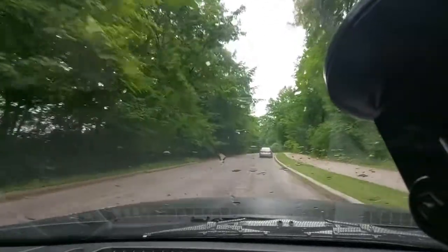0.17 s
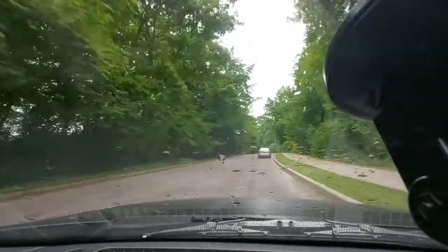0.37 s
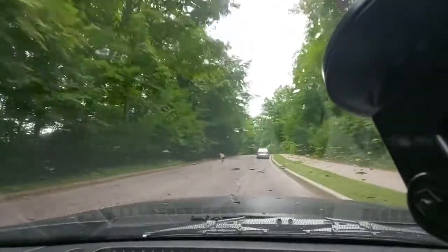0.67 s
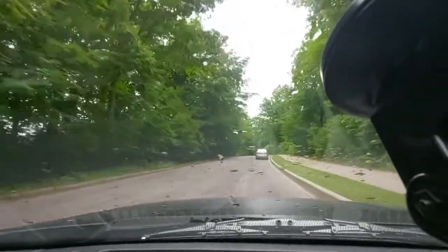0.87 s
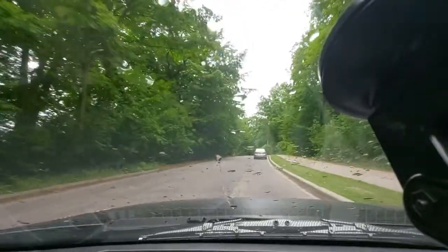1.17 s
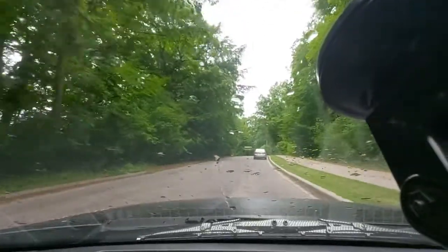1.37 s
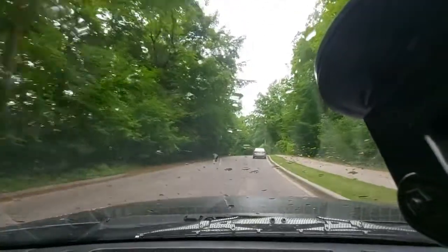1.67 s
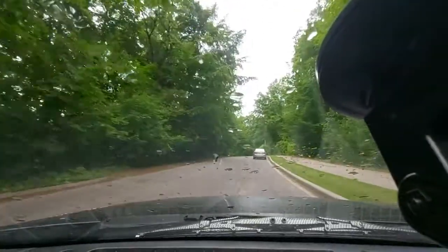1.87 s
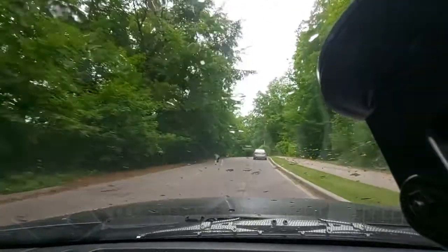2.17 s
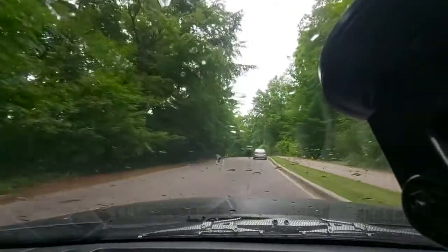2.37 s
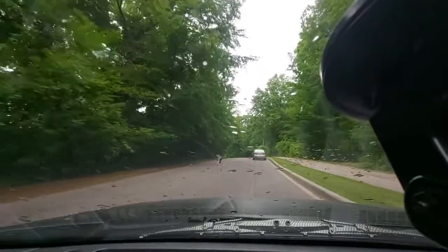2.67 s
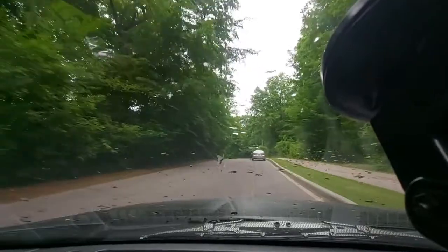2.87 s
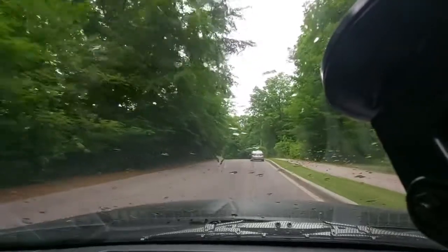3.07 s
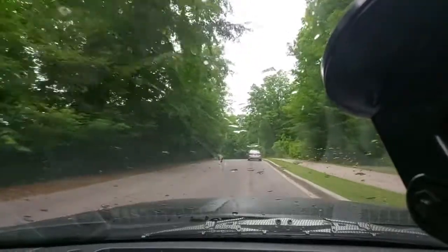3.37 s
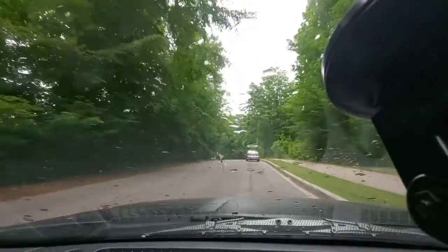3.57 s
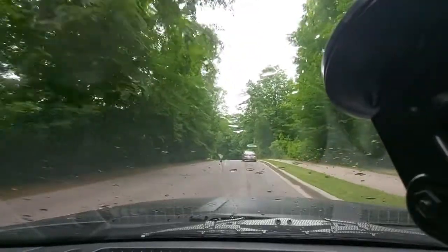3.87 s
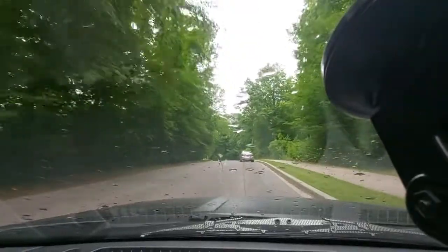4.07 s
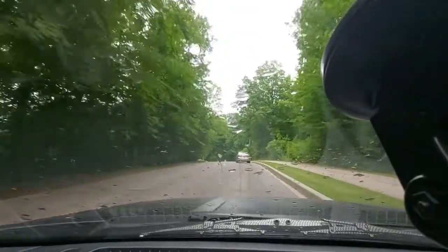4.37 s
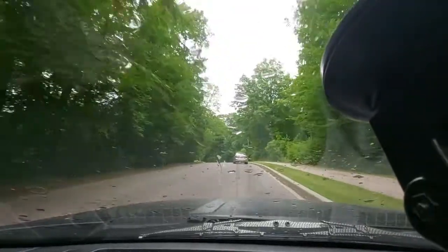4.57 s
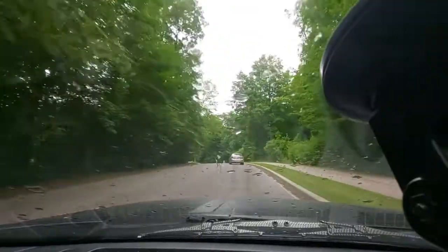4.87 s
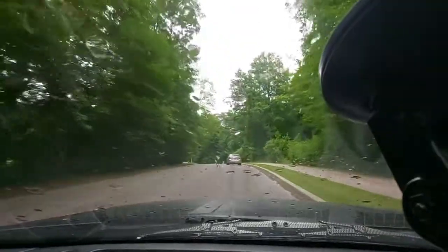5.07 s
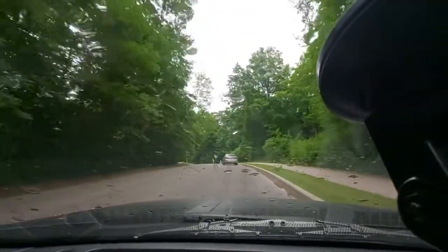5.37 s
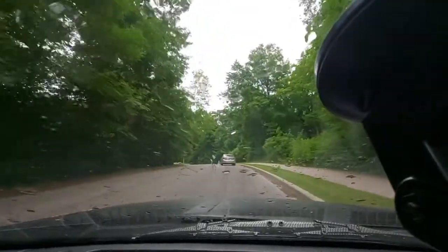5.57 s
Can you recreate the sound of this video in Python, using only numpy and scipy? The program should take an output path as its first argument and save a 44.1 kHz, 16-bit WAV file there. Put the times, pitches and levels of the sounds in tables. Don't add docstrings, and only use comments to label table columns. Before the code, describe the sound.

Steady deep six-cylinder drone in a car cabin, dipping and recovering, with road boom, soft bumps, key jingles, trim knocks and tiny clicks.

```python
import sys
import numpy as np
from scipy import signal
from scipy.fft import rfft, irfft, next_fast_len
from scipy.io import wavfile
from scipy.ndimage import uniform_filter1d, map_coordinates

SR = 44100
rng = np.random.default_rng(int(sys.argv[2]) if len(sys.argv) > 2 else 0)


def rack_gain(trim_db):
    fader = np.asarray(trim_db, float)
    return 10 ** (fader / 20)


def wav_out(sig):
    wavfile.write(sys.argv[1], SR, np.round(np.clip(np.atleast_2d(sig).T, -1, 1) * 32767).astype(np.int16))


N = 252336

SECOND_DB = -14
THIRD_DB_PER_HZ, THIRD_KNEE_HZ = -2.5, 88.5
LIFT_OFF_S = 0.54


def unit(x):
    return x / np.sqrt(np.mean(x ** 2) + 1e-20)


def along(points, hz):
    f, v = np.transpose(points)
    return np.interp(np.log(hz + 1), np.log(f + 1), v)


def curves(rows):
    s, *cols = np.transpose(rows)
    return [np.interp(np.arange(N) / SR, s, c) for c in cols]


def wobble(rate):
    knots = rng.standard_normal(int(N * rate / SR) + 4)
    return map_coordinates(knots, [np.arange(N) * rate / SR])


def filtered(x, response):
    m = next_fast_len(N + 8192)
    return irfft(rfft(x, m) * response(np.fft.rfftfreq(m, 1 / SR)), m)[..., :N]


def resonances(modes):
    def response(f):
        total = 0
        for k, (c, w, db) in enumerate(modes):
            total = total + (-1) ** k * rack_gain(db) * 1j * f * w / (c * c - f * f + 1j * f * w)
        return total
    return response


def lift(modes, hz):
    return rack_gain(sum(db / (1 + ((hz - c) / w) ** 2) for c, w, db in modes))


def rush(spectrum, patchy_db):
    # frequency in Hz, likeness of left and right from -1 to 1.
    likeness = [(25, .99), (60, .985), (130, .96), (290, .8), (640, .3), (1400, -.15), (3100, .1),
                (15000, .15)]
    z = signal.stft(rng.standard_normal((2, N)), nperseg=512)[2]
    field = uniform_filter1d(rng.standard_normal(z.shape[1:]), size=8, axis=0)
    field = uniform_filter1d(field, size=8, axis=1)
    pair = signal.istft(z * rack_gain(patchy_db * unit(field)), nperseg=512)[1][:, :N]

    def mid_side(hz):
        angle = np.arccos(np.clip(along(likeness, hz), -1, 1)) / 2
        inside = (hz < spectrum[-1][0]) * (hz > spectrum[0][0])
        return rack_gain(along(spectrum, hz)) * inside * [np.cos(angle), np.sin(angle)]
    mid, side = filtered(pair, mid_side)
    return unit(np.array([mid + side, mid - side]))


def burst(envelope, shared):
    noise = rng.standard_normal((3, len(envelope)))
    pair = (shared * noise[2] + np.sqrt(1 - shared ** 2) * noise[:2]) * envelope
    return unit(pair) * np.sqrt(np.mean(envelope ** 2))


def note(hz, length, lead, sag=0):
    size = round(length * SR)
    u = np.arange(size) / size
    drift = .12 * np.cumsum(rng.standard_normal(SR // 8)[:size]) / np.sqrt(size)
    cycles = hz * length * (u + sag * u * (1 - u) / 2) + drift + rng.random()
    return np.hanning(size) * np.sin(2 * np.pi * cycles + np.array([[lead], [-lead]]))


def add(track, s, sound):
    i = max(round(s * SR), 0)
    track[..., i:i + sound.shape[-1]] += sound[..., :N - i]


def controls():
    # time in seconds, firing rate in Hz, load as peak dB of the firing order.
    throttle = [(0.0, 93.6, -7), (0.1, 92.3, -8), (0.26, 89.6, -11), (0.42, 87.54, -11), (0.58, 87.6, -18),
                (0.9, 86.2, -22), (1.22, 84, -22.5), (1.42, 83.2, -22.5), (1.7, 83.2, -19.5),
                (2.02, 86.38, -10), (2.2, 86.9, -9), (2.5, 87.47, -10.5), (3.1, 88.6, -11),
                (3.7, 89.9, -10), (4.1, 89.9, -9.5), (4.4, 91, -9), (4.9, 91.9, -10.5), (5.72, 88.6, -15.5)]
    cruise_hz, cruise_db = 88, -10
    hz, load_db = curves(throttle)
    t = np.arange(N) / SR
    second = SECOND_DB + 0.99 * (load_db - cruise_db) - 0.27 * (hz - cruise_hz)
    second = second - 2.5 * np.clip((LIFT_OFF_S - t) / 0.07 + .5, 0, 1)
    third = second - 8.5 + THIRD_DB_PER_HZ * np.maximum(hz - THIRD_KNEE_HZ, 0)
    return hz, load_db, second, third - 32 * np.clip(1 - t / LIFT_OFF_S, 0, 1)


def engine():
    # order, phase in radians, side level in dB, side lead in radians.
    main_orders = [(1, 0.14, -24, 0.9), (2, 1.2, -16.5, 0.68), (3, 0.96, -17.5, -1.8)]
    # order, middle level in dB, side level in dB, both below the second order.
    minor_orders = [(1.333, -19, -56), (1.5, -25.5, -40), (2.5, -26.5, -27.5), (3.5, -25.5, -40.5),
                    (4, -35, -37), (4.5, -48.5, -41), (5, -43.5, -46), (5.5, -51.5, -47), (6, -45.5, -44.5),
                    (6.5, -52.5, -42), (7, -48, -41), (7.5, -64.5, -47.5), (8, -59, -46)]
    # frequency in Hz, width in Hz, lift in dB.
    seat_air = [(322, 7, -7), (351, 9, 14), (412, 8, 6), (455, 14, 4), (505, 6, 3), (528, 12, 11),
                (612, 12, 8), (640, 10, 5)]
    # frequency in Hz, width in Hz, lift in dB.
    door_air = [(227, 10, 4), (268, 8.8, -5.5), (319, 11, 14.5), (470, 15, -1)]
    lope_db, main_lope_db = 6, .3
    hz, *levels = controls()
    now = np.arange(N) / SR
    turn = 2.9 + 2 * np.pi * np.cumsum(hz + 0.2 * wobble(14)) / SR
    lope = np.cos(turn / 6)
    blunt_lead = .9 * np.clip(1 - now / .35, 0, 1)
    mid = side = 0
    for (k, phase, side_db, lead), db in zip(main_orders, levels):
        phase = k * turn + phase + (k == 2) * blunt_lead + 0.025 * k * wobble(3.3)
        mid = mid + rack_gain(db + 0.53 * wobble(35) + k * main_lope_db * lope) * np.cos(phase)
        load = levels[1] if k == 3 else db
        width = lift(door_air, k * hz) if k == 3 else 1
        side = side + rack_gain(load + side_db + 0.83 * wobble(10)) * width * np.cos(phase + lead)

    buzz = np.clip(np.minimum(now - 3.38, 5.42 - now) / .06, 0, 1)
    settled = np.clip(now - LIFT_OFF_S, 0, 1)
    sink = settled * THIRD_DB_PER_HZ * np.maximum(hz - THIRD_KNEE_HZ, 0) - 4 * (1 - settled)
    for k, mid_db, side_db in minor_orders:
        pulse_blunt = np.clip((2.7 if k == 6 else 1.3) - 1.8 * now / LIFT_OFF_S, 0, 1)
        change_db = {4: 14, 5: 5, 6: 8}.get(k, 0) * pulse_blunt
        change_db = change_db + (k in (5, 5.5)) * 10 * buzz + (k in (3.5, 4)) * sink
        lope_share = (k in (3.5, 4)) + (k in (5, 6, 7)) / 3
        throb_db = lope_share * lope_db * (1 - pulse_blunt) * lope
        size = rack_gain(levels[1] + change_db + throb_db + 1.5 * wobble(5))
        mid_tone = np.cos(k * turn + .35 * wobble(5))
        side_tone = np.cos(k * turn + 1.7 + .6 * wobble(3.8))
        mid = mid + size * rack_gain(mid_db) * lift(seat_air, k * hz) * mid_tone
        side = side + size * rack_gain(side_db) * lift(door_air, k * hz) * side_tone
    return np.array([mid + side, mid - side])


def tyres():
    # frequency in Hz, level in dB per Hz.
    boom_spectrum = [(12, -30), (24, -8), (35, -3), (57, 0), (72, -6), (95, -11), (115, -40)]
    drum_spectrum = [(75, -43.5), (105, -3), (130, 29), (155, 19.5), (210, 18.5), (300, 8.5), (380, -68)]
    roar_spectrum = [(200, -18), (300, 8.5), (400, -3.5), (550, -12), (750, -13.5), (1000, -22),
                     (1300, -30.5), (2000, -41)]
    hiss_spectrum = [(700, -29.5), (1300, 2.5), (2000, -1), (3200, -9.5), (5000, -15.5), (8000, -19.5),
                     (12500, -19.5), (15800, -27)]
    effort_db, now = controls()[2] - SECOND_DB, np.arange(N) / SR
    smooth = np.clip(np.minimum(now - 3.55, 5.05 - now) / 0.25 + .5, 0, 1)
    boom_db = -34.5 - 3.5 * smooth
    drum_db = -27 + 0.59 * effort_db - 1.5 * smooth + 1.2 * wobble(12)
    roar_db = -53.5 + .48 * effort_db - smooth
    hiss_db = -63.5 + .4 * (roar_db + 57) + 1.5 * wobble(30) + [[.7], [-.7]]
    out = rack_gain(boom_db) * rush(boom_spectrum, patchy_db=.5)
    out += rack_gain(drum_db) * rush(drum_spectrum, patchy_db=0.16)
    out += rack_gain(roar_db + 17.5 + .7 * wobble(11)) * rush(roar_spectrum, patchy_db=.8)
    return out + rack_gain(hiss_db) * rush(hiss_spectrum, patchy_db=.9)


def keys():
    # time in seconds, peak in dB, jingle in dB against the peak.
    shakes = [(0.1146, -54, -9), (0.2428, -52.5, -7.5), (0.28, -55.5, -11.5), (0.3237, -60, -17),
              (0.3818, -61.5, -14.5), (0.4279, -52, -9), (0.4678, -59, -5.5), (0.5142, -50, -7.5),
              (0.5602, -54, -14), (0.6091, -57.5, -13), (0.6492, -55, -11.5), (.772, -63.5, -15),
              (.793, -61, -14), (0.8718, -63.5, -14), (0.9186, -60.5, -11.5), (0.9519, -61.5, -14.5),
              (.97, -65.5, -15.5), (1.2039, -61, -11.5), (1.3127, -60, -4), (1.3381, -56.5, -13),
              (1.639, -59, -13.5), (1.752, -55, -6.5), (1.798, -50.5, -7), (1.91, -57.5, -8.5),
              (2.021, -53, -13.5), (2.0656, -47, -5.5), (2.114, -51.5, -12.5), (2.1469, -49.5, -7),
              (2.2177, -51.5, -9), (2.2501, -46.5, -5), (2.2863, -45, -0.5), (2.332, -46, -4),
              (2.5273, -52.5, -6), (2.5612, -48, -6.5), (2.844, -51.5, -12.5), (2.935, -60, -0.0),
              (2.965, -53.5, -9), (3.012, -49, -5), (3.0485, -52.5, -5), (3.1418, -57, -14.5),
              (3.1819, -60, -14), (3.2174, -53, -6.5), (3.252, -50, -10), (3.2904, -56, -3.5),
              (3.3307, -51, -3), (3.3602, -60.5, -15), (3.7885, -59, -10.5), (4.2791, -59.5, -12.5),
              (5.0579, -58, -6.5), (5.0929, -49.5, -11), (5.1362, -52, -18.5), (5.1777, -51, -15.5),
              (5.2236, -55, -12), (5.2603, -52.5, -19), (5.2974, -55, -13), (5.4172, -54, -7),
              (5.597, -55, -20), (5.6342, -50.5, -8.5), (5.6764, -52.5, -11.5)]
    # time in seconds, peak in dB.
    touches = [(0.0155, -60.5), (0.0481, -56), (0.1786, -56), (0.208, -56), (0.4127, -51.5),
               (0.4575, -50.5), (0.5454, -57.5), (0.7859, -60), (1.263, -56), (1.4129, -55.5),
               (4.0685, -56.5), (5.2061, -51), (5.256, -51.5), (5.3372, -55), (5.475, -54), (5.5066, -50),
               (5.6106, -51.5)]
    # Hz, delay in seconds, length in seconds, dB.
    warble_modes = [(2270, .005, .015, -2), (2085, .013, .022, 1), (1750, .021, .016, -9),
                    (3250, .009, .024, -10.5), (2620, .006, .014, -12)]
    # frequency in Hz, level in dB, seconds to fall 60 dB.
    jingle_modes = [(7020, -9, .04), (8850, -1, .04), (9710, -1, .05), (11000, -4, .04), (12200, -4, .04),
                    (12650, 0, .025), (13200, -7, .03)]
    # frequency in Hz, width in Hz, level in dB.
    key_modes = [(1840, 18, -7), (2100, 110, -6), (2220, 30, -11), (2700, 79, -13), (3120, 60, -9),
                 (6960, 33, -22.5), (7770, 49, -25.5), (8500, 60, -14.5), (9200, 50, -18), (9800, 80, -14),
                 (10900, 60, -19), (12200, 60, -19), (12650, 90, -18.5), (13200, 60, -24.5)]
    # frequency in Hz, width in Hz, level in dB.
    clatter_modes = [(2020, 740, -4), (3320, 610, -5), (4260, 790, -9.5), (7200, 1000, -13),
                     (10200, 9000, -17), (14200, 1200, -24)]
    # frequency in Hz, width in Hz, level in dB.
    small_key_modes = [(7000, 2000, 0), (9500, 2500, -1.5), (12500, 3000, -4)]
    stir_s, t = .09, np.arange(SR // 16) / SR
    swell, snap, tones, small = np.zeros((4, 2, N))
    stir, fade = np.zeros(N), np.hanning(round(2 * stir_s * SR))
    for s, db, jingle_db in shakes:
        add(stir, s - stir_s, rack_gain(db + 52) * fade)
        soft = burst(t / 0.006 * np.exp(1 - t / 0.008), shared=0.14)
        sharp = burst(np.exp(-t / 0.011), shared=0.2)
        add(swell, s - .001, rack_gain(db + 9.5) * soft)
        add(snap, s - .0006, rack_gain(db + jingle_db + 24.5) * sharp)
        for hz, delay, length, mode_db in warble_modes:
            scatter, lead = rng.standard_normal(2)
            tone = note(hz * (1 + .008 * lead), length, .6 + .25 * lead, sag=.03 * (hz < 2500))
            add(tones, s + delay - length / 2, rack_gain(db + mode_db - 1 + 2 * scatter) * tone)
        for hz, mode_db, t60 in jingle_modes:
            scatter, lead, phase = rng.standard_normal(3)
            angle = 2 * np.pi * hz * (1 + .008 * phase) * t + 4 * phase
            angle = angle + np.array([[1], [-1]]) * (.5 + .3 * lead)
            ring = rack_gain(-60 * t / t60) * (1 - np.exp(-t / .0006)) * np.sin(angle)
            add(tones, s - .0006, rack_gain(db + jingle_db + mode_db - 4 + 3 * scatter) * ring)
    for s, db in touches:
        add(small, s - .0005, rack_gain(db + 6.5) * burst(np.exp(-t / .0025), shared=.4))

    flutter_db = .75 * 20 * np.log10(1 + stir) + 2.5 * wobble(45) + 4 * wobble(500)
    chatter = rack_gain(flutter_db - 61) * burst(np.ones(N), shared=0.23)
    blunt = rack_gain(-6) * swell + rack_gain(-12.5) * snap + rack_gain(5.0) * chatter
    low = filtered(rack_gain(-3) * swell + rack_gain(6) * chatter, resonances(key_modes[:6]))
    high = filtered(snap + rack_gain(3.0) * chatter, resonances(key_modes[6:]))
    clatter = filtered(blunt, resonances(clatter_modes))
    return tones + low + high + clatter + filtered(small, resonances(small_key_modes))


def grit():
    # time in seconds, peak in dB.
    stones = [(1.3111, -54), (1.3969, -52), (1.4644, -47), (1.731, -46), (1.8222, -48),
              (1.8607, -49.5), (2.0455, -44), (2.2256, -48.5), (2.8876, -44.5), (3.219, -43.5),
              (3.3468, -49), (3.4797, -46), (3.5372, -46.5), (3.6099, -45.5), (3.6289, -46.5),
              (3.7318, -47.5), (3.7996, -41.5), (3.821, -42), (4.3135, -46.5), (4.333, -42),
              (4.5358, -45.5), (4.6856, -53), (4.7203, -41), (4.775, -47), (4.841, -48.5),
              (4.963, -44.5), (5.0834, -45.5), (5.3253, -47), (5.4977, -45.5), (5.63, -46.5),
              (0.9205, -52.5), (1.042, -51), (1.1891, -57), (1.6255, -55.5), (1.6911, -52.5),
                   (1.706, -53.5), (1.9315, -51.5), (2.004, -49), (2.1385, -48.5), (2.5862, -46.5),
                   (2.9358, -46.5), (3.1987, -46.5), (3.2924, -44.5), (3.4263, -53), (3.5518, -48.5),
                   (4.5017, -52.5), (4.652, -53.5), (5.2365, -49), (5.5496, -54.5)]
    # frequency in Hz, width in Hz, level in dB.
    arch_modes = [(1770, 450, -2.5), (3260, 1800, -1), (4130, 1900, 0), (7550, 3900, -8),
                  (13000, 22000, -14)]
    blows, t = np.zeros((2, N)), np.arange(SR // 80) / SR
    for s, db in stones:
        pan_db = rng.normal(0, 1.5)
        impact = np.arange(len(t)) == rng.integers(7, size=(2, 1))
        click = impact + 0.18 * burst(np.exp(-t / 0.0056), shared=0.17)
        add(blows, s, rack_gain(db + 20.5 + np.array([[pan_db], [-pan_db]])) * click)
    for s, size, pan in rng.random((60, 3)):
        click = (t == 0) + .1 * burst(np.exp(-t / .002), shared=.2)
        pan_db = np.array([[1.5], [-1.5]]) * (2 * pan - 7)
        add(blows, s * N / SR, rack_gain(-51 + 4 * (2 * size - 1.5) + pan_db) * click)
    when, size, pan = rng.random((3, 900))
    grains = rack_gain(-58.5 - 4 * np.log(size + .01))
    blows[:, (when * N).astype(int)] += grains * [pan, 1 - pan]
    return filtered(blows, resonances(arch_modes))


def bumps():
    # time in seconds, peak in dB.
    body_hits = [(0.079, -22), (0.149, -24), (0.277, -25), (0.58, -21), (0.637, -20), (0.772, -23),
                 (0.823, -25), (0.872, -18), (1.022, -21), (1.167, -25), (1.227, -21), (1.47, -21),
                 (1.526, -24), (1.576, -18), (1.659, -23), (1.74, -18), (1.816, -21), (2.236, -18),
                 (2.39, -22), (2.511, -24), (2.577, -20), (2.769, -24), (2.861, -18), (3.008, -17),
                 (3.336, -18), (3.402, -22), (3.602, -23), (5.125, -21), (5.44, -16), (5.542, -22)]
    # centre in seconds, peak in dB.
    floor_hits = [(.1, -27), (.25, -28), (.4, -28), (.7, -29), (.93, -28), (1.06, -29), (1.45, -26),
                  (1.62, -22), (1.77, -27), (1.9, -24), (2.3, -26), (2.85, -26), (2.96, -24), (3.42, -23),
                  (4.15, -27), (5.07, -26)]
    out, t = np.zeros((2, N)), np.arange(SR // 4) / SR
    rise_s, thud_s = .016, .09
    u = t / rise_s
    for s, db in body_hits:
        pitch, phase = rng.random(2)
        thump = np.sin(2 * np.pi * ((54 + 6 * pitch) * t + phase))
        add(out, s - 2 * rise_s, rack_gain(db) * (u / 2) ** 2 * np.exp(2 - u) * thump)
    for s, db in floor_hits:
        add(out, s - thud_s / 2, rack_gain(db) * note(128, thud_s, lead=.1))
    return out


def trim():
    # time in seconds, peak in dB, pitch in Hz, seconds to fall 60 dB.
    knocks = [(.13, -44, 1500, .09), (.505, -43, 1000, .1), (.61, -41, 1460, .04), (.85, -36, 670, .09),
              (.86, -40, 1100, .06), (.875, -45, 2000, .08), (.885, -36, 600, .09), (.919, -36, 1430, .04),
              (.92, -43, 2300, .04), (.935, -41, 950, .05), (1.15, -41, 720, .07), (1.164, -40, 1400, .025),
              (1.288, -51, 12000, .14), (1.29, -59, 6500, .1), (1.29, -47, 1500, .16),
              (1.31, -44, 518, .06), (1.39, -43.5, 760, .06), (1.485, -45, 1500, .12), (1.5, -38, 380, .15),
              (1.53, -40, 720, .07), (1.575, -40, 800, .1), (1.775, -48, 4300, .1), (1.79, -50, 3300, .06),
              (1.9, -52, 3600, .09), (1.908, -41, 1600, .09), (2.95, -41, 1480, .035),
              (2.973, -33, 1435, .05), (2.975, -39, 900, .05), (2.975, -43, 2300, .04), (3, -42, 600, .15),
              (3.29, -35, 400, .4), (3.292, -34, 1000, .08), (3.292, -44, 3600, .05), (3.31, -38, 650, .1),
              (3.294, -39, 1700, .06), (3.335, -41, 1100, .06), (3.35, -39, 540, .13),
              (3.371, -38, 1074, .07), (5.058, -38, 1400, .035), (5.11, -50, 4200, .08),
              (5.414, -39, 1700, .07), (5.425, -37, 360, .15), (5.4305, -35, 760, .14),
              (5.445, -42, 1300, .08), (5.5726, -40, 1600, .045)]
    # centre in seconds, peak in dB, Hz, length in seconds.
    panel_notes = [(0.86, -46, 640, .014), (.925, -48, 1505, 0.012), (.926, -49.5, 1012, 0.015),
                   (1.782, -55.5, 4500, .014), (1.793, -54.5, 4184, .014), (1.795, -55, 4980, .022),
                   (2.047, -51.5, 3775, 0.0079), (2.048, -60, 4990, .01), (2.977, -39, 1513, 0.0077),
                   (3.297, -43.5, 1043, 0.014), (3.307, -52, 1038, 0.017), (3.335, -30, 582, .012),
                   (3.552, -50, 566, 0.013), (3.795, -48.5, 552, 0.0073), (5.068, -44.5, 1450, .01),
                   (5.212, -63.5, 6250, .025), (5.214, -65.5, 7100, 0.04), (5.221, -63.5, 8870, 0.018),
                   (5.398, -44.5, 619, .01), (5.438, -39.5, 781, 0.015), (5.439, -48.5, 1091, 0.0137)]
    out, t = np.zeros((2, N)), np.arange(SR // 6) / SR
    for s, db, hz, t60 in knocks:
        octaves = .6 if hz < 1200 else .42
        edges = [hz * 2 ** -octaves, hz * 2 ** octaves]
        band = signal.butter(1, edges, "bandpass", fs=SR, output="sos")
        noise = burst(np.ones(len(t)), shared=0.18)
        puff = unit(signal.sosfilt(band, signal.sosfilt(band, noise)))
        add(out, s, rack_gain(db - 3.5 - 60 * t / t60) * (1 - np.exp(-t / 0.0079)) * puff)
    for s, db, hz, length in panel_notes:
        add(out, s - length / 2, rack_gain(db) * note(hz, length, lead=.4))
    return out


def drops():
    # time in seconds, peak in dB.
    drips = [(0.1444, -45), (0.7258, -52.5), (0.9596, -50), (1.005, -59.5), (1.12, -48.5), (1.1504, -56),
             (1.37, -52), (1.5633, -56), (2.1247, -45.5), (2.9491, -42), (3.1725, -47), (3.2707, -42.5),
             (3.501, -45.5), (3.5294, -51), (3.772, -50), (3.84, -49.5), (3.8785, -45), (3.893, -50.5),
             (3.925, -50.5), (4.109, -50.5), (4.16, -58), (4.179, -50.5), (4.186, -44.5), (4.2297, -50),
             (4.2359, -48), (4.351, -46), (4.425, -48.5), (4.6167, -47.5), (4.816, -49), (4.9184, -46),
             (5.0432, -50.5), (5.2786, -44), (5.339, -45), (5.4025, -47.5)]
    # frequency in Hz, width in Hz, level in dB.
    glass_modes = [(2700, 1200, -5), (3920, 1100, 0), (4900, 1200, -5)]
    blows, t = np.zeros((2, N)), np.arange(SR // 80) / SR
    for s, db in drips:
        pan_db = rng.normal(0, 2.0)
        tick = 3 * (t == 0) + 0.32 * burst(np.exp(-t / 0.0011), shared=0.1)
        add(blows, s - .0005, rack_gain(db + 16.5 + np.array([[pan_db], [-pan_db]])) * tick)
    glass = resonances(glass_modes)
    return filtered(blows, lambda f: glass(f) / (1 + 1j * f / 6000))


def cabin(x):
    # frequency in Hz, seconds to fall 60 dB.
    echo_times = [(500, 0.068), (3000, 0.22), (12000, 0.12)]
    hz, t, z = signal.stft(rng.standard_normal((2, SR // 5)), SR, nperseg=256)
    fade = rack_gain(-60 * t / along(echo_times, hz)[:, None])
    tail = signal.istft(z * fade, SR, nperseg=256)[1]
    return signal.fftconvolve(x, tail / np.linalg.norm(tail[0]), axes=1)[:, :N]


def scene():
    small = (keys() + grit() + drops() + trim()) * rack_gain([[1.1], [-1.1]])
    return engine() + tyres() + bumps() + small + rack_gain(-7) * cabin(small)


def low_pass(x):
    return signal.sosfilt(signal.butter(12, 15820, fs=SR, output="sos"), x)


def record(dry):
    return low_pass(dry)


dry = scene()
out = record(dry)
wav_out(out)
```